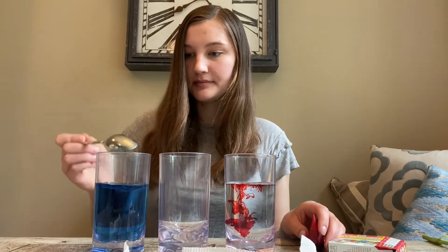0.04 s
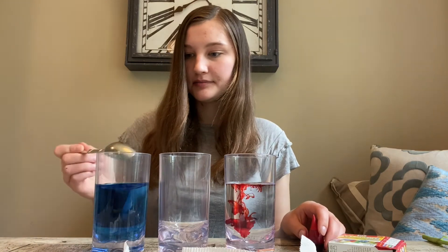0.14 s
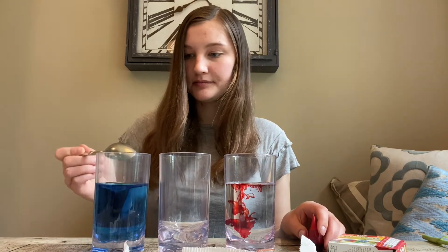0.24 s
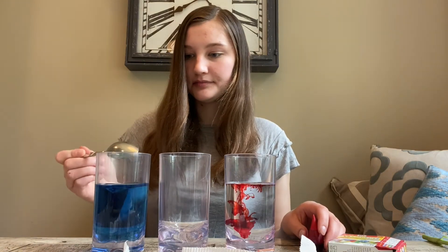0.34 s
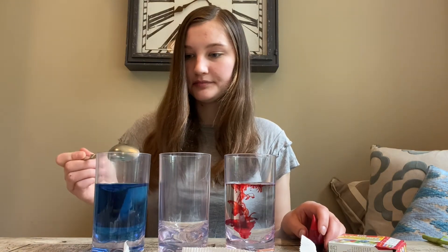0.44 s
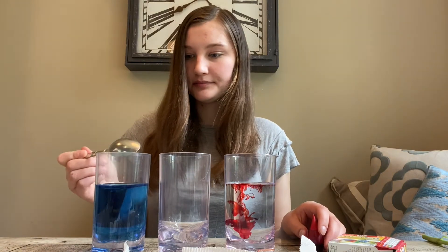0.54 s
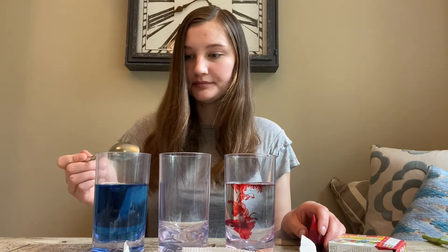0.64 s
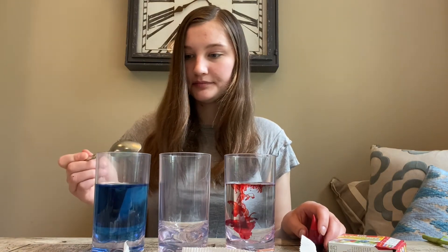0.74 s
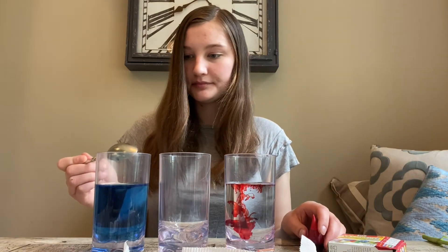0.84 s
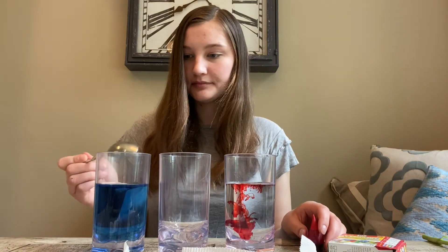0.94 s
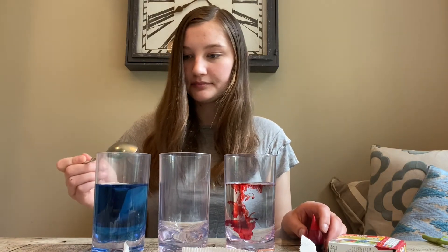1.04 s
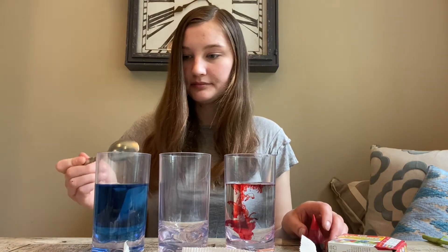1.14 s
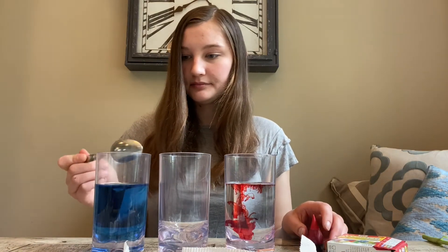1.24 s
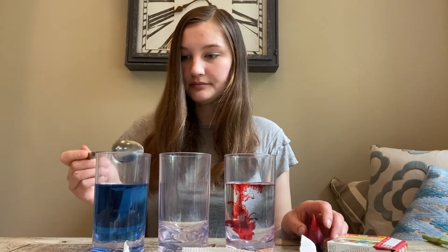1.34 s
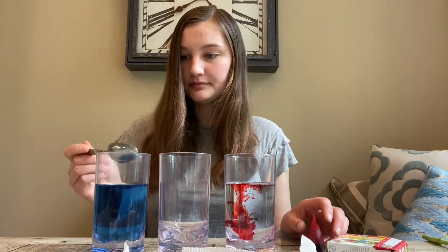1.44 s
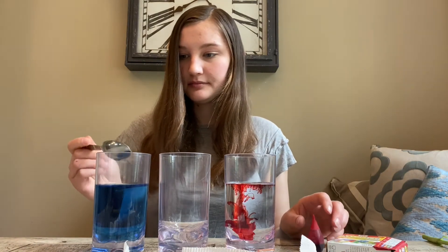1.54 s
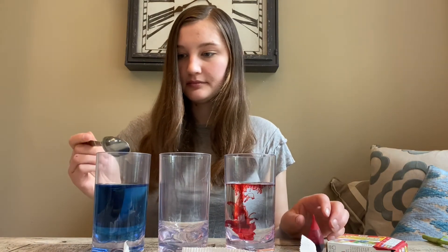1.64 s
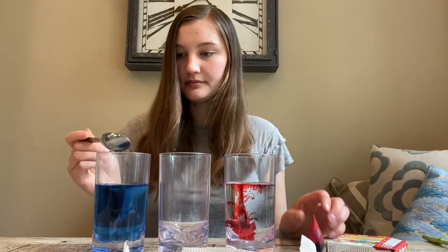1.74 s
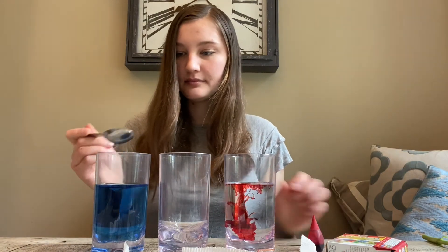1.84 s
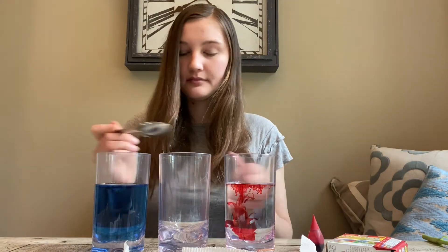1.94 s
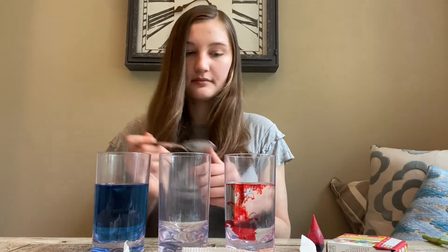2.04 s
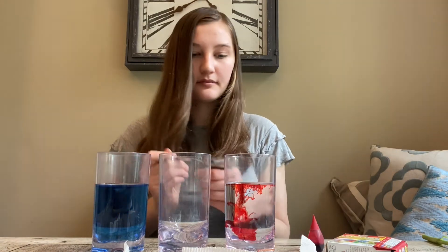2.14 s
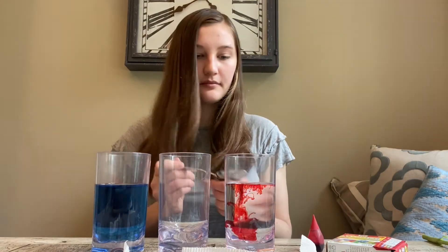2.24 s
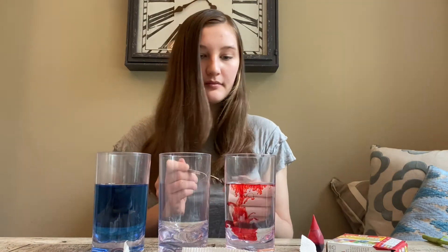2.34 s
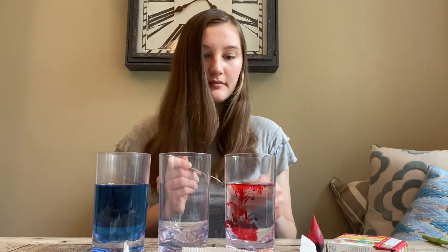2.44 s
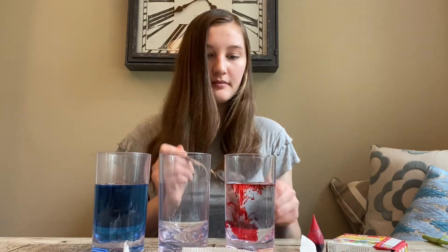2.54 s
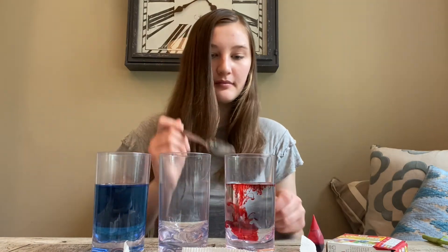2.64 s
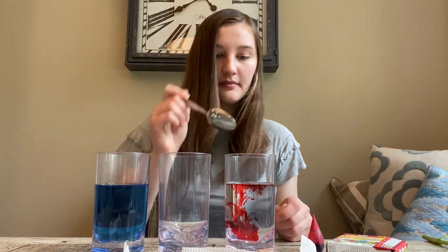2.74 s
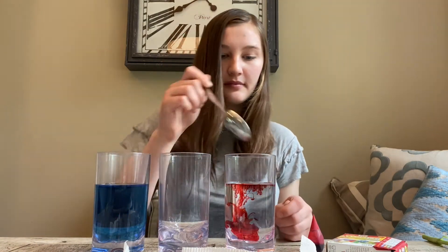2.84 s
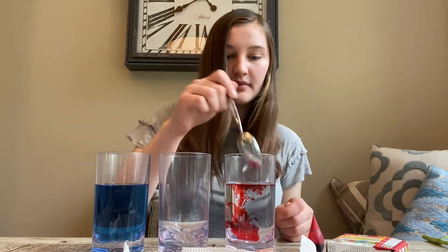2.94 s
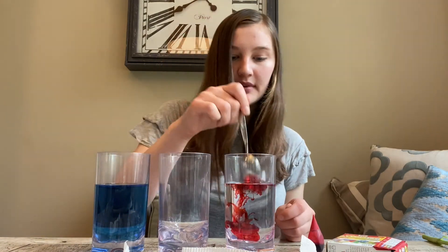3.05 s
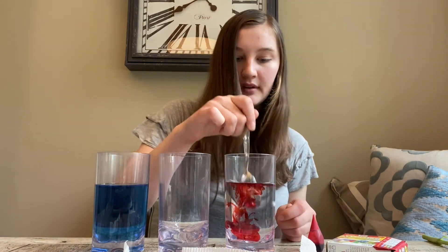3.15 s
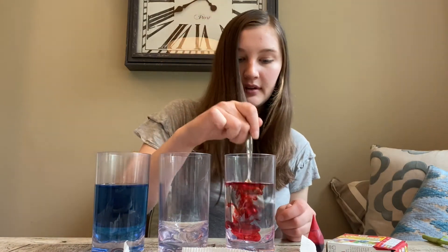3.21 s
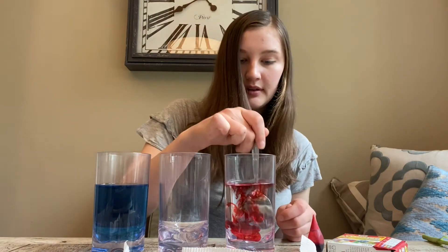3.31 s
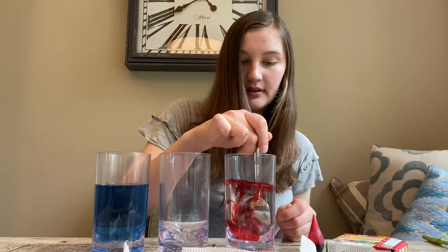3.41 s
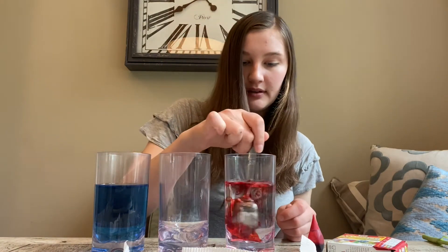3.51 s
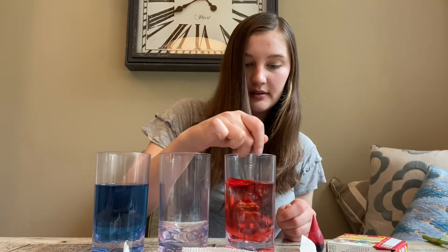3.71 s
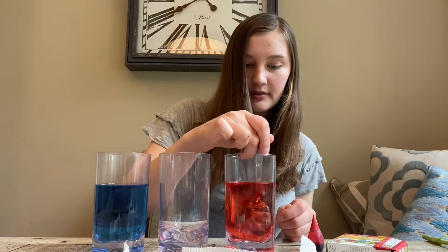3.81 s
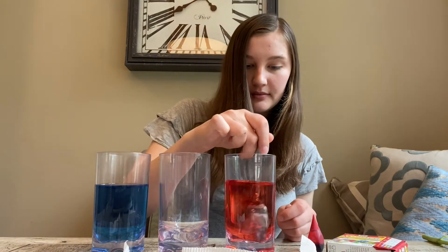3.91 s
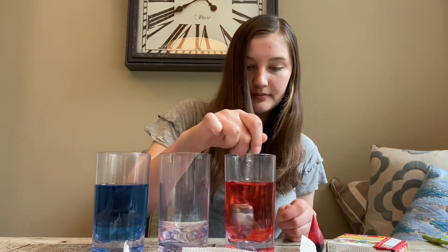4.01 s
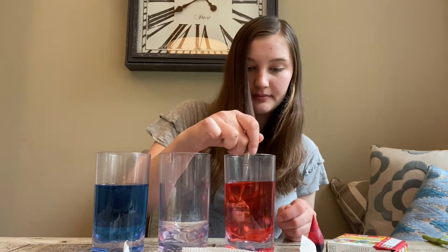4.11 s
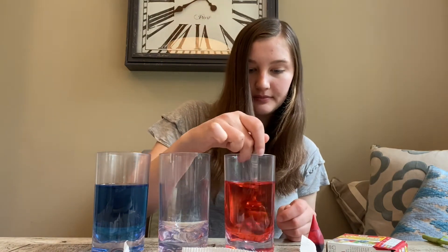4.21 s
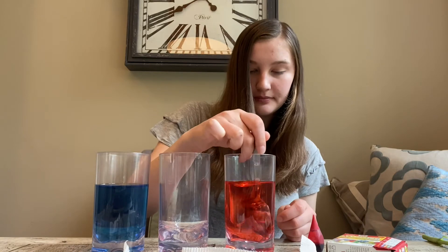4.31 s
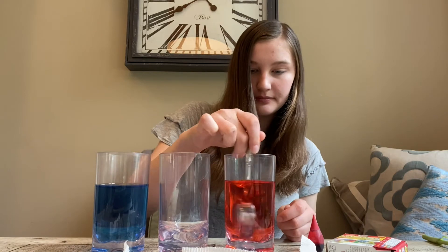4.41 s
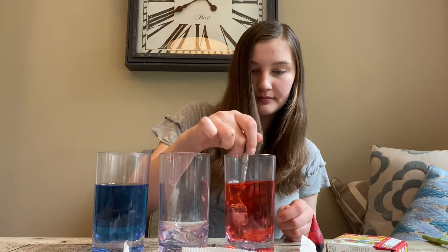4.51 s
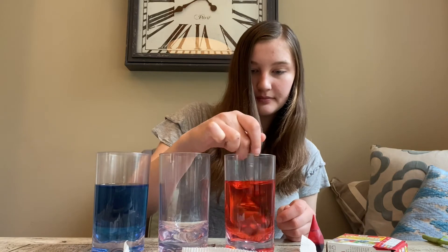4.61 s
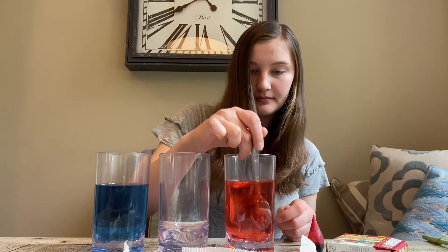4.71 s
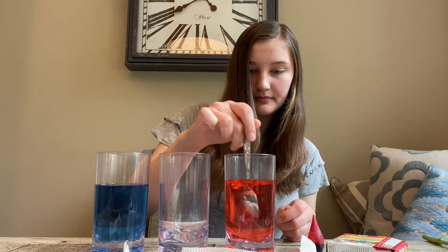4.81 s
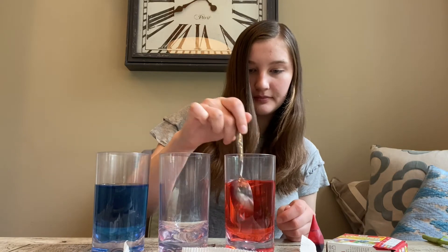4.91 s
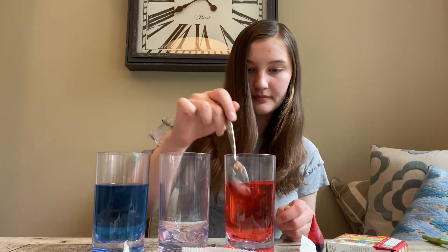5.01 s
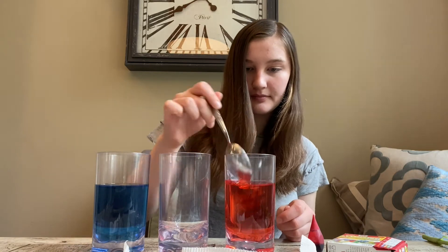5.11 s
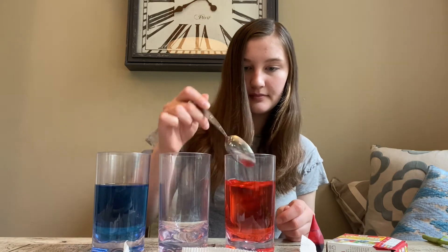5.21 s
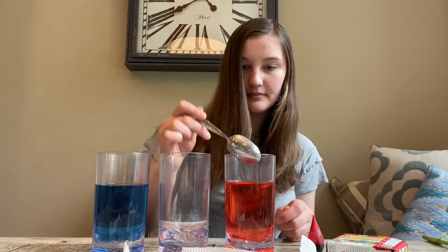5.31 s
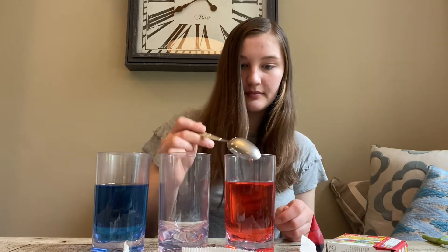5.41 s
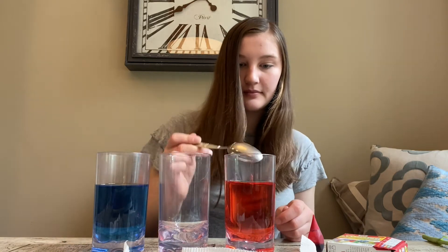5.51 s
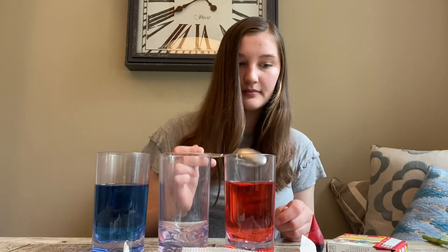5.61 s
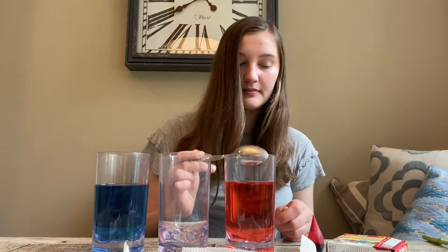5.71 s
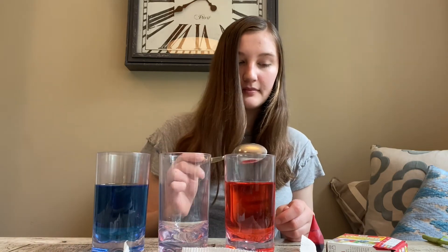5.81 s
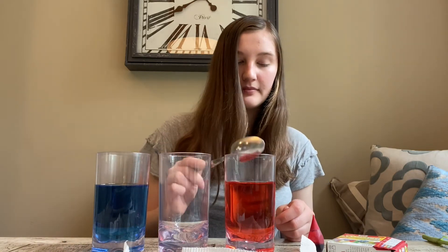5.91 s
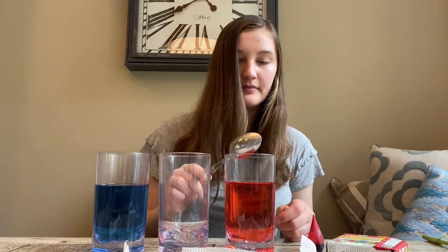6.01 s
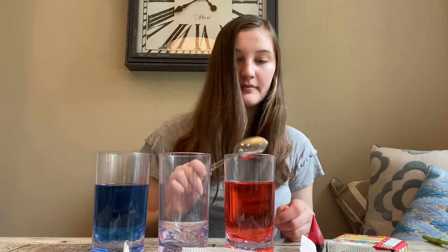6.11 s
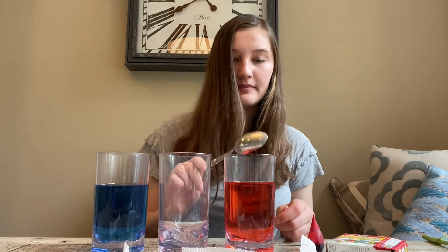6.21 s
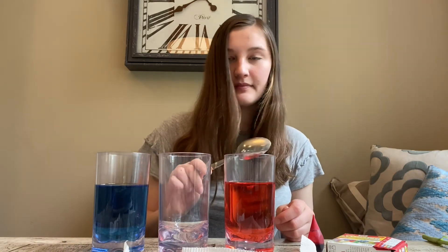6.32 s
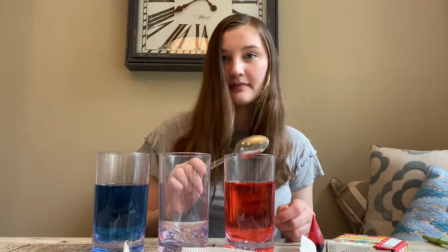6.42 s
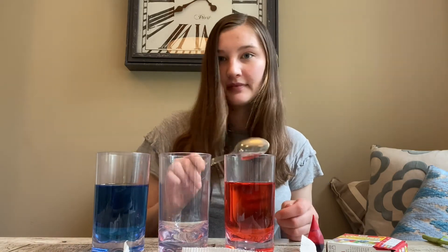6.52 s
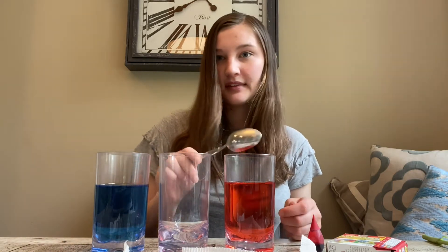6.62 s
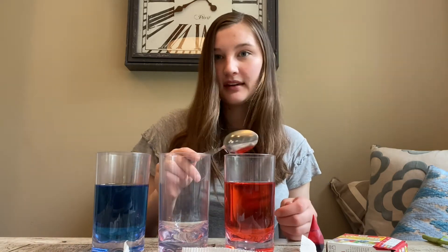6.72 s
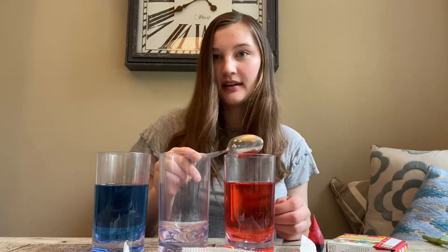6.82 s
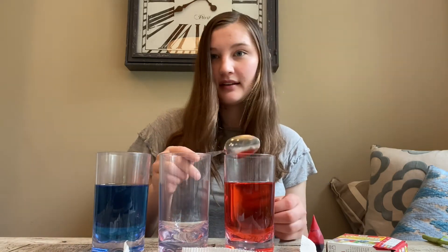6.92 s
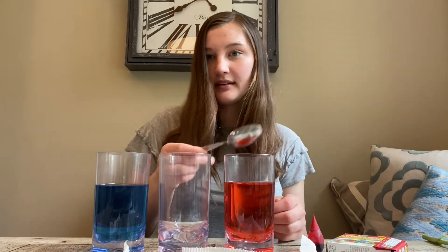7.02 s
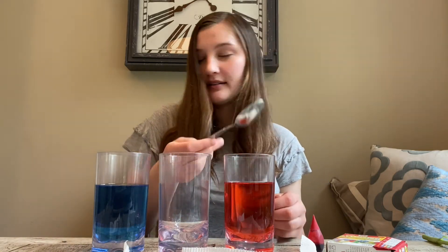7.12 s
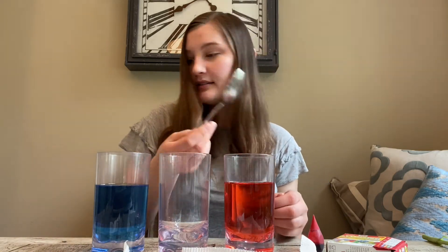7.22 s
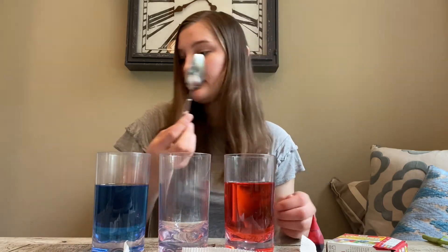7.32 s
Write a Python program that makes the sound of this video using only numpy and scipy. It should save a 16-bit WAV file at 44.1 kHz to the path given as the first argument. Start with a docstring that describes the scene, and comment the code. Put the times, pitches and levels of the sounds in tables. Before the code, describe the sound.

Close up at a wooden table indoors: about five quickening spoon taps on a thick plastic cup, the last hardest, some with a quick double contact. A gap follows with faint ticks, then lighter, muffled, slightly ringing knocks as the spoon stirs water in another cup. Another pause, then several clear rim taps. Short room echo, soft air rumble and a barely audible low hum continue underneath.

```python
"""A metal spoon taps the rim of one plastic tumbler, knocks the wet wall of a second while stirring, then taps
its rim. Small ticks and faint spoon singing fall before, between and after; room echo, ventilation rumble, hiss
and hum run on. Each blow sums decaying modes of table (thud), tumbler (knock) and spoon (ring) with a short
noise crack. Small ticks are short rings with a high snap; the singing is resonant noise; the echo is decaying
diffuse noise."""
import sys
import numpy as np
from scipy import signal
from scipy.fft import rfft, irfft, next_fast_len
from scipy.io import wavfile

SR = 44100
rng = np.random.default_rng(int(sys.argv[2]) if len(sys.argv) > 2 else 0)


def write(x):
    x = np.atleast_2d(x).T
    wavfile.write(sys.argv[1], SR, np.round(np.clip(x, -1, 1) * 32767).astype(np.int16))


N = 324135

# spoon on a tumbler's rim: (time [s], thud level [dB], knock level [dB], tick level [dB])
RIM_TAPS = [(0.267, -38, -52, -60.5), (0.459, -42, -60.5, -65.5), (0.651, -28.5, -44, -66.5),
            (0.818, -24, -38, -60), (0.845, -34.5, -44, -71), (0.991, -23, -36.5, -59),
            (1.017, -37, -45.5, -71.5), (1.166, -20.5, -27.5, -56.5), (1.197, -42, -53.5, -56),
            (5.636, -25, -30.5, -56.5), (5.673, -29.5, -38.5, -60), (6.123, -24, -34, -81.5),
            (6.307, -27.5, -35.5, -60.5), (6.488, -26.5, -37, -63), (6.886, -31, -53, -62),
            (6.897, -35, -48, -79.5)]
# spoon on the wall under water: (time [s], thud level [dB], knock level [dB], tick level [dB])
STIR_KNOCKS = [(3.58, -41.5, -34.5, -56), (3.725, -33.5, -48.5, -77.5), (3.771, -39.5, -57.5, -105),
               (3.889, -38, -38, -64), (3.946, -32.5, -53.5, -73), (4.056, -39.5, -30, -51),
               (4.112, -35.5, -56, -70), (4.354, -45, -49, -93), (4.449, -38.5, -36, -72),
               (4.487, -39.5, -39.5, -66), (4.53, -35.5, -61, -82), (4.658, -40.5, -52, -100),
               (4.74, -45, -40.5, -51.5), (4.765, -40, -49, -56.5), (4.786, -49, -45, -75),
               (4.802, -46, -56, -88)]
# low ends of the layers: (deep thud offset [dB], low knock offset [dB], low tick offset [dB],
# share by which the low knock follows the thud [0-1])
RIM_LOW_ENDS = (-4.5, 1.2, 1.34, 0.73)
WALL_LOW_ENDS = (-12, -6, 6, 0.8025)
# table top modes: (frequency [Hz], relative level [dB], t60 [s])
TABLE_MODES = [(66.44, -7, 0.35), (98.5, 0, 0.2), (117.54, -12, 0.46), (156.6, -8, 0.24), (170.7, 6, 0.11),
               (196.7, -8.5, 0.22), (245.7, -12.5, 0.35), (263.2, -8, 0.32), (309.8, -12, 0.33),
               (350.1, -5.5, 0.11), (388.7, -3, 0.083), (480.3, -12.5, 0.13), (50.93, -13, 0.27)]
# tumbler modes, struck on the rim: (frequency [Hz], width [Hz], relative level [dB])
RIM_PEAKS = [(480, 190, 8.5), (543, 65.6, 1), (603.4, 39.2, -5.5), (665.3, 44, 0.5), (712, 210, 1),
             (826.6, 41, -7), (910, 50, -10), (970, 70, 0), (1119, 180, 13.5), (1198.4, 65.6, 0.5),
             (1335, 90, -1), (1654, 210, -1), (1924, 270, -27.5), (1974, 150, -6.5)]
CLEAR_WIDTH_HZ = 9   # sets the two narrow modes of the filled tumbler that ring on from blow to blow
# tumbler modes, struck on the wet wall: (frequency [Hz], width [Hz], relative level [dB])
WALL_PEAKS = [(557, 44, 0), (641, 62, 8), (709.6, 2 * CLEAR_WIDTH_HZ, -5), (794, 55, -0.5), (1002, 81, 7.5),
              (1159, 32, -9.5), (1180, 140, 9.5), (1408, 97, 5), (1458.7, CLEAR_WIDTH_HZ, -7),
              (1667, 80, -9), (1757, 96, -10.5), (2088, 130, -12)]
# spoon modes: (frequency [Hz], relative level [dB])
SPOON_MODES = [(2776, -7), (3110, -2.5), (3440, -14), (3703, 1), (4750, 2.5), (5200, 5), (6900, 9),
               (8400, -6), (12000, -13)]
# contact noise spectrum: (frequency [Hz], relative level per Hz [dB])
CRACK_SPECTRUM = [(900, -37), (1800, -1), (2570, -6.5), (3730, -8), (5650, -26.5), (7060, -35.5),
                  (9500, -45.5), (12300, -44), (15000, -55)]
# small dry ticks and drips: (time [s], ring level [dB], pitch [Hz], snap level [dB])
SMALL_TICKS = [(0.116, -53.5, 1590, -94), (1.835, -51, 900, -85), (2.900, -58.5, 4460, -65),
               (2.997, -69, 4500, -42), (3.008, -77, 4500, -58), (3.149, -54.5, 1950, -72),
               (3.231, -59, 4330, -73), (6.739, -43, 2500, -52), (6.758, -50, 2790, -52),
               (6.772, -58, 3680, -67)]
# snap on top of a small tick: (frequency [Hz], relative level [dB], t60 [s])
SNAP_MODES = [(11670, -1.5, 0.0036), (14600, 5, .004)]
# faint singing of the spoon: (start [s], length [s], level [dB])
SPOON_SINGING = [(0.106, .03, -65.5), (0.715, .14, -77), (1.828, 0.048, -84), (2.968, 0.15, -80),
                 (4.095, 0.25, -69), (5.585, 0.12, -81), (6.869, 0.092, -80), (7.287, 0.2, -75)]
# spoon modes that sing: (frequency [Hz], width [Hz], relative level [dB])
SINGING_PEAKS = [(3400, 350, -9.5), (3940, 110, -17.5)]
# room echo: (frequency [Hz], t60 [s], relative level [dB])
ROOM_DECAY = [(60, 0.79, -19.5), (260, 0.41, -6), (920, 0.44, -5), (2760, 0.4, -5), (7100, .27, -7),
              (13000, 0.21, -13)]
# ventilation and hiss spectrum: (frequency [Hz], relative level per Hz [dB])
AIR_SPECTRUM = [(15, -44), (25, -33), (45, -3.5), (60, -6.5), (105, -6.5), (170, -2), (257, -7.5),
                (353, -13.5), (616, -17), (1290, -33.5), (2400, -44), (6000, -54.5), (8240, -53),
                (12500, -59.5), (14000, -69)]
# microphone pair in a diffuse field: (frequency [Hz], likeness [0-1], turn of the right side [rad])
MIC_PAIR = [(60, .6, .05), (170, .8, -.3), (300, .5, -1.1), (500, .7, -2.4), (1200, .45, -2.3),
            (3000, .1, -2.1), (5000, .15, -.4), (6200, .9, 0), (7500, .98, 0), (10300, .85, -.3),
            (11800, .8, -2.1), (15000, .9, -2.4)]

SPOON_Q = 16   # fingers and water damp the spoon to a few cycles
TICK_BASE_T60_S, TICK_CYCLES = 0.00067, 13   # a small tick's t60 is the base plus this many cycles
TICK_LEAN, SHARP_BOOM, USUAL_TICK_DB = 0.51, 0.36, -30   # share, dB per dB, tick level against thud
FIRST_UNTIL_S = 2   # blows before this are on the first tumbler, which sounds fuller
FIRST_DEEP_DB, FIRST_LOW_KNOCK_DB, FIRST_LOW_TICK_DB = 3.5, 5.5, 2.5
AIR_DB = -54.5
HUM_HZ, HUM_DB, HUM_LEFT_OVER_RIGHT_DB = 117.3, -63, -13.5
CUTOFF_HZ = 16300

SIZE = next_fast_len(N + SR)
HZ = np.maximum(np.arange(SIZE // 2 + 1) * SR / SIZE, 1)


def from_db(db):
    """Decibels to amplitude gain."""
    return 10 ** (np.asarray(db) / 20)


def at_hz(rows, hz, axis=1):
    """Table column interpolated on a log-frequency axis."""
    rows = np.array(rows, float)
    return np.interp(np.log(hz), np.log(rows[:, 0]), rows[:, axis])


def clicks(times_s, gains):
    """Train of single-sample blows."""
    out = np.full(N, 1e-18)   # tiny floor keeps the filters off denormals
    index = (np.asarray(times_s) * SR).astype(int)
    np.add.at(out, np.minimum(index, N - 1), gains)
    return out


def diffuse(gain, envelope=1):
    """Stereo noise spectrum with the pair's likeness and phase turn; rms about 1 at envelope 1."""
    a, b = rfft(rng.standard_normal((2, N)) * envelope, SIZE)
    alike = np.clip(at_hz(MIC_PAIR, HZ), 0, 1)
    mixed = alike * a + np.sqrt(1 - alike ** 2) * b
    right = mixed * np.exp(1j * at_hz(MIC_PAIR, HZ, axis=2))
    return np.array([a, right]) * gain / np.sqrt(np.mean(gain ** 2))


def as_modes(peaks):
    """Resonance width to t60: a narrower peak rings longer."""
    return [(hz, db, np.log(1000) / (np.pi * width_hz)) for hz, width_hz, db in peaks]


def struck(times_s, low_db, high_db, modes, ends_hz, spread_db, bend_s, turn):
    """Blows ring every mode; bending waves bring low modes late, and each side hears its own phase."""
    out = np.zeros((2, N))
    luck = rng.standard_normal((len(times_s), len(modes)))
    for k, (hz, db, t60_s) in enumerate(modes):
        # a harder contact feeds the upper modes
        high_share = at_hz(np.transpose([ends_hz, (0, 1)]), hz)
        level_db = low_db + high_share * (high_db - low_db) + db + spread_db * luck[:, k]

        late_s = bend_s * np.sqrt(100 / hz)   # travel time falls with the root of frequency
        hit = clicks(np.add(times_s, late_s / 2), from_db(level_db))
        swell = np.exp(-2 / (late_s * SR + 1))
        pole = from_db(-60 / (t60_s * SR)) * np.exp(2j * np.pi * hz / SR)
        ring = signal.lfilter([(1 - swell) ** 2], np.poly([pole, swell * pole, swell * pole]), hit)

        unlike = (1 - at_hz(MIC_PAIR, hz)) * min(hz / 300, 1) ** 2
        mode_turn = turn * unlike * (-1) ** k * rng.uniform(0.64, 0.65)
        pair_turn = at_hz(MIC_PAIR, hz, axis=2) * np.clip(hz / 11000, 0.2, 1)
        side_rad = mode_turn + pair_turn
        out += np.imag(ring * np.exp([[-0.5j * side_rad], [0.5j * side_rad]]))
    return out


def levels(blows, low_ends):
    """Low and high level of each layer: the low knock leans to the thud, the low tick to the knock."""
    s, thud_db, knock_db, tick_db = np.transpose(blows)
    deep_db, low_knock_db, low_tick_db, knock_lean = low_ends
    first = s < FIRST_UNTIL_S
    # a tick sharper than usual against its thud booms more
    sharpness_db = tick_db - thud_db - USUAL_TICK_DB
    deep = thud_db + deep_db + SHARP_BOOM * sharpness_db + first * FIRST_DEEP_DB
    low_knock = knock_db + knock_lean * (thud_db - knock_db) + low_knock_db + first * FIRST_LOW_KNOCK_DB
    low_tick = tick_db + TICK_LEAN * (knock_db - tick_db) + low_tick_db + first * FIRST_LOW_TICK_DB
    return s, low_knock, knock_db, deep, thud_db, low_tick, tick_db


def spoon_on(blows, cup_peaks):
    """Each blow rings the table as thud, the tumbler as knock and the damped spoon."""
    s, knock_low, knock_high, thud_low, thud_high, tick_low, tick_high = blows
    cup = as_modes(cup_peaks)
    spoon = as_modes([(hz, hz / SPOON_Q, db) for hz, db in SPOON_MODES])
    thud = struck(s, thud_low, thud_high, TABLE_MODES,
                  ends_hz=(90, 300), spread_db=3.0, bend_s=0.011, turn=4.55)
    knock = struck(s, knock_low, knock_high, cup,
                   ends_hz=(620, 1300), spread_db=3.0, bend_s=0.006, turn=2.31)
    ring = struck(s, tick_low, tick_high, spoon,
                  ends_hz=(4000, 8000), spread_db=2.0, bend_s=0.0031, turn=2.5)
    return from_db(7.0) * thud + from_db(7.5) * knock + from_db(3.5) * ring


def contact_cracks(blows):
    """Metal touching plastic: a noise burst of some ms, in a lower and an upper part."""
    s, *_, tick_low, tick_high = blows
    treble = 1 / (1 + (6000 / HZ) ** 6)
    spectrum = from_db(at_hz(CRACK_SPECTRUM, HZ))
    rise = np.exp(-1 / (0.0011 * SR))
    out = 0
    for share, level_db, fall_s in ((1 - treble, tick_low + 4, 0.005), (treble, tick_high + 3, 0.008)):
        fall = np.exp(-1 / (fall_s * SR))
        envelope = signal.lfilter([1 - rise], np.poly([rise, fall]), clicks(s, from_db(level_db)))
        out = out + irfft(diffuse(share * spectrum, envelope), SIZE)[:, :N]
    return out


def small_ticks():
    """Each tick is one short ring at its own pitch, with a snap high above it."""
    out = np.zeros((2, N))
    for at_s, db, hz, _ in SMALL_TICKS:
        mode = (hz, 0, TICK_BASE_T60_S + TICK_CYCLES / hz)
        out += struck([at_s], db, db, [mode], ends_hz=(1, 2), spread_db=0, bend_s=0, turn=1)
    s, *_, snap_db = np.transpose(SMALL_TICKS)
    return out + struck(s, snap_db, snap_db, SNAP_MODES, ends_hz=(1, 2), spread_db=2, bend_s=0, turn=1)


def spoon_singing():
    """Noise in two modes of the spoon, swelling and fading."""
    colour = sum(from_db(db) / (1 + (2 * (HZ - hz) / width_hz) ** 2) for hz, width_hz, db in SINGING_PEAKS)
    t = np.arange(N) / SR
    rub = np.zeros(N)
    for start_s, length_s, db in SPOON_SINGING:
        progress = np.clip((t - start_s) / length_s, 0, 1)
        rub += from_db(db) * np.sin(np.pi * np.sqrt(progress))
    return rub * irfft(diffuse(colour), SIZE)[:, :N]


def room(near):
    """Echo tail, driven by the left side: diffuse noise builds over some ms and dies band by band."""
    t = np.arange(SR) / SR
    noise = diffuse(np.ones(len(HZ)))
    tail = 0
    for hz in 45 * 2 ** np.arange(0, 9, 0.5):
        # overlapping bands add up to one
        band = np.cos(np.pi * np.clip(np.log2(HZ / hz), -0.5, 0.5)) ** 2
        fade = from_db(-60 * t / at_hz(ROOM_DECAY, hz)) * (1 - np.exp(-t / 0.0017))
        fade = fade / np.sqrt(np.sum(fade ** 2))
        tail = tail + irfft(noise * band, SIZE)[:, :SR] * fade * from_db(at_hz(ROOM_DECAY, hz, axis=2))
    return irfft(rfft(tail, SIZE) * rfft(1.455 * near[0], SIZE), SIZE)[:, :N]


def ventilation_and_hiss():
    """Steady diffuse noise: ventilation rumble below, microphone hiss above."""
    return from_db(AIR_DB) * irfft(diffuse(from_db(at_hz(AIR_SPECTRUM, HZ))), SIZE)[:, :N]


def hum():
    """One sine, slowly wavering in level, stronger on the right."""
    n = np.arange(N)
    steps = N // 2000 + 2
    waver = np.interp(n / 2000, np.arange(steps), rng.standard_normal(steps))
    tone = from_db(HUM_DB + 1.3 * waver) * np.sqrt(2) * np.sin(2 * np.pi * HUM_HZ * n / SR)
    return tone * from_db([[HUM_LEFT_OVER_RIGHT_DB / 2], [-HUM_LEFT_OVER_RIGHT_DB / 2]])


def scene():
    """All blows, ticks and slides, their echo and the background."""
    taps = levels(RIM_TAPS, RIM_LOW_ENDS)
    stirs = levels(STIR_KNOCKS, WALL_LOW_ENDS)
    near = spoon_on(taps, RIM_PEAKS) + spoon_on(stirs, WALL_PEAKS)
    near = near + contact_cracks(np.hstack([taps, stirs])) + small_ticks() + spoon_singing()
    return near + room(near) + ventilation_and_hiss() + hum()


def record(dry):
    """The small microphones drop the deepest bass; the top is cut."""
    thin = signal.sosfilt(signal.butter(2, 40, "high", fs=SR, output="sos"), dry)
    return signal.sosfilt(signal.cheby2(12, 70, CUTOFF_HZ, fs=SR, output="sos"), thin)


dry = scene()
out = record(dry)
write(out)
```